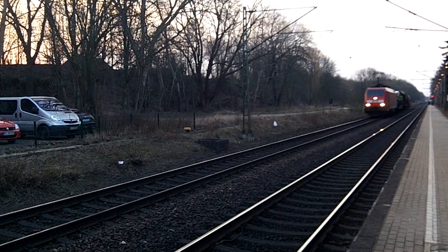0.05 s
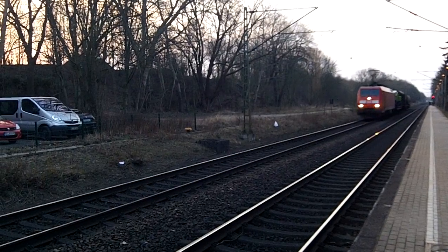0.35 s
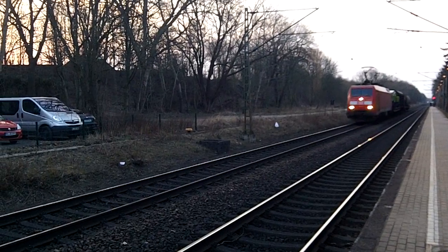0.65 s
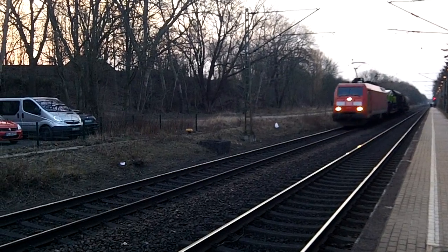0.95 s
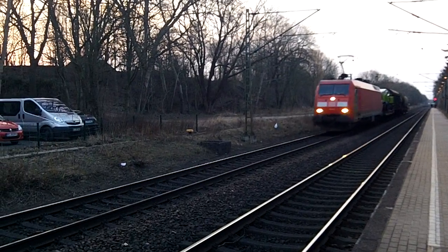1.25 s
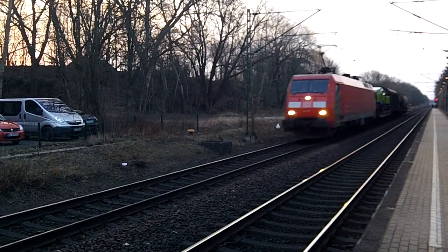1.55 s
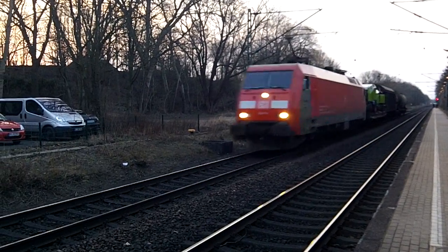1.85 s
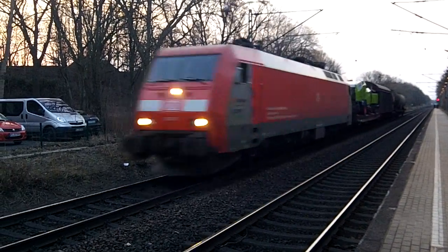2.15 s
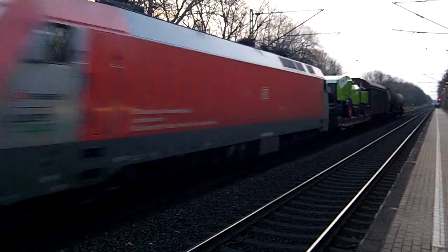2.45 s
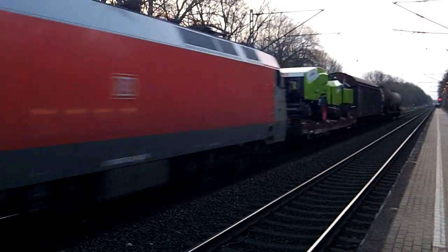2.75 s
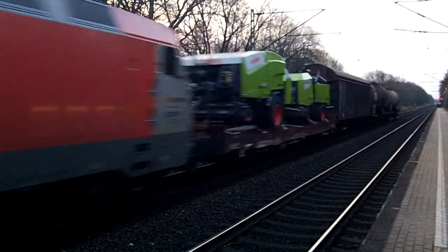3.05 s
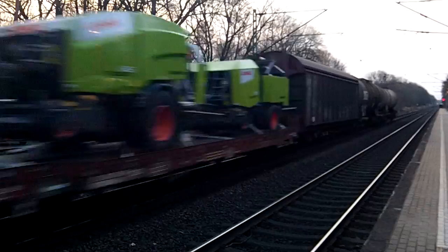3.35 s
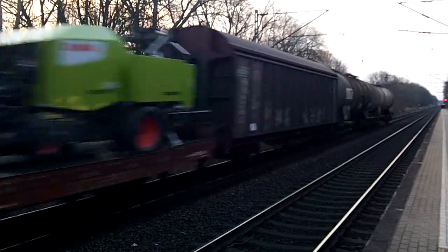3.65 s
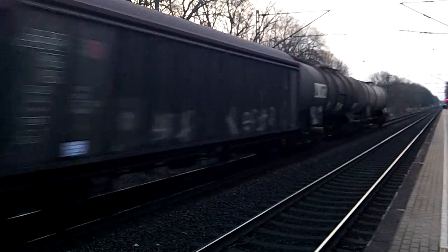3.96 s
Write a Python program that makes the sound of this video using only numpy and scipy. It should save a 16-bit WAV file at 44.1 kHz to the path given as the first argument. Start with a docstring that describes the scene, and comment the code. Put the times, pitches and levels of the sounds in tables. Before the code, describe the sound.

A freight train approaches and rushes past with a growing roar and thudding wheels.

```python
"""Rails roar and sing over a ground rumble, and a small bird chirps faintly: an electric freight train
runs up to a station platform and rushes past on the far track. The locomotive's axles thud over a
rail joint, the wheels hiss as they draw level, and the hollow roar of the wagons takes over, with
short wheel notes and the clank of loose gear. Roar, hiss and rumble are shaped noise, ringing steel
is noise-driven resonances, and the track's modes, the wheel notes and the bird are sines."""
import sys
import numpy as np
from scipy import signal
from scipy.fft import rfft, irfft
from scipy.io import wavfile
from scipy.ndimage import uniform_filter1d

SR = 44100
rng = np.random.default_rng(int(sys.argv[2]) if len(sys.argv) > 2 else 0)


def master_out(mix):
    """Clip the mix to full scale and print it as 16-bit PCM to the path in sys.argv[1]."""
    frames = np.transpose(np.atleast_2d(mix))
    ceiling = np.clip(frames, -1, 1)
    pcm = np.round(ceiling * 32767).astype(np.int16)
    wavfile.write(sys.argv[1], SR, pcm)


N = 176400

# Fader rides of the noise beds: t/s, level/dB
RAIL_FADER = [(0, -34), (.55, -31), (1.2, -29), (1.65, -26), (2.2, -25), (2.65, -28), (3.0, -28.5),
              (3.45, -28), (3.53, -29.5), (3.72, -27), (4, -27)]
WAGON_FADER = [(0, -44), (1.4, -33), (1.55, -28.5), (1.85, -36), (2.1, -31), (2.8, -29.5), (3.2, -27.5),
               (3.45, -24), (3.57, -25), (3.7, -26), (3.79, -27), (4, -24.5)]
HISS_FADER = [(0, -55), (.9, -49.5), (1.5, -43.5), (2.2, -35), (2.52, -36.5), (2.64, -33), (2.8, -33.5),
              (3.15, -34), (3.47, -37), (3.51, -46.5), (3.74, -38), (3.87, -42), (4, -35)]
GROUND_FADER = [(0, -44.5), (.3, -40.5), (.6, -43), (1.2, -41.5), (1.55, -36.5), (1.7, -31), (1.98, -33.5),
                (2.12, -34.5), (2.4, -32.5), (2.6, -33), (2.9, -30.5), (3.1, -30), (3.3, -29.5), (3.5, -36),
                (3.8, -36), (4, -38.5)]
BOGIE_FADER = [(0, -50), (.42, -49), (.55, -44.5), (1.55, -39), (1.7, -35), (1.95, -36.5), (2.4, -32.5),
               (2.65, -32.5), (3.08, -31), (3.3, -36.5), (3.6, -38), (4, -40.5)]
BACKGROUND_FADER = [(0, -65.5), (1.2, -65.5), (2.2, -63), (2.75, -64.5), (3.2, -67.5), (3.6, -70), (4, -70)]
# EQ curves of the noise layers: f/Hz, relative level/dB
RAIL_EQ = [(200, -30), (350, -11.5), (480, -2), (600, -1), (800, -2), (1030, -1), (1500, -3), (1900, -1.5),
           (2300, -5), (2750, -9.5), (3400, -11), (4000, -17), (5000, -21), (6000, -31), (7000, -32),
           (8500, -56)]
WAGON_EQ = [(150, -13), (300, -15), (430, -6.5), (560, -2), (690, -1.5), (870, -4), (1100, -7),
            (1400, -8.5), (2000, -30), (3500, -24.5), (7000, -101)]
HISS_EQ = [(1000, -31), (1800, -1), (2500, 3.5), (3200, 3), (4000, -2.5), (5000, -5), (6200, -10),
           (6900, -17.5), (8000, -40)]
SIZZLE_EQ = [(4000, -8), (5500, 5), (6300, 12), (7000, -9), (9000, -33)]
GROUND_EQ = [(12, 6), (24, 2), (32, -3), (41, 7), (50, 2.5), (80, 2.5), (105, -10.5), (140, -8), (250, -42)]
BOGIE_EQ = [(60, -20), (100, -5.5), (120, -7), (152, -5.5), (185, 1.5), (245, -3), (295, -7), (400, -10.5),
            (800, -42)]
BACKGROUND_EARLY_EQ = [(6000, -6), (8000, -12), (10000, 7.5), (11500, 1.5), (13000, 2.5)]
BACKGROUND_LATE_EQ = [(6000, -4.5), (8000, -3.5), (10000, 6), (11200, -4), (12500, -20)]
BALLAST_EQ = [(25, -7.5), (60, -7), (95, -10), (130, 3), (175, -15), (225, 1), (260, -22), (300, -15),
              (600, -35), (2000, -48)]
# A small bird's calls: t/s, level/dB, length/s
BIRD_CALLS = [(.04, -54, .085), (.37, -51, .11), (.575, -52.5, .075)]
# Bogie, rail and wheel resonances: peak t/s, half length/s, f/Hz, width/Hz, drift/(Hz/s), level/dB
STEEL_RINGS = [(.2, 0.085, 3770, 80, -200, -57), (.25, 0.02, 6740, 94, -800, -57),
               (.5, 0.51, 1077, 490, -3, -36.5), (.685, 0.011, 6530, 400, -2000, -55),
               (1.2, 0.59, 67.4, 24, 0, -39.5), (1.63, 0.42, 1886, 118.8, -1.5, -39.5),
               (2.4, 0.5, 1971, 200, 0, -38), (1.555, 0.0073, 867, 356.4, -6, -21.5),
               (2.11, 0.055, 56.3, 8.1, 0, -28.5), (2.15, 0.14, 602, 160, -0.5, -40),
               (2.58, 0.057, 81.5, 19, -3.5, -28), (2.62, 0.35, 698.2, 63, 0, -30),
               (2.63, 0.063, 2600, 2000, -1.5, -31), (2.44, 0.028, 2002, 2400, 0, -28),
               (2.87, 0.12, 80.8, 41, -4, -31.5), (2.9, 0.21, 196, 26, -1, -36),
               (3.05, .3, 3350, 416.7, -300, -39), (3.17, 0.018, 91.6, 32, -5.5, -29.5),
               (3.3, 0.54, 107.5, 22, -1.5, -38.5), (3.47, 0.04, 735, 150, -300, -23),
               (3.67, 0.058, 600, 150, -1, -33.5), (3.88, 0.047, 690, 130, -3.5, -28)]
# Axles hitting the rail joint: t/s, thud level/dB, clink level/dB
AXLE_HITS = [(1.603, -28.5, -37), (1.701, -30.5, -50), (1.8, -31.5, -58), (2.04, -32, -47),
             (2.15, -33, -38), (2.229, -32.5, -39)]
# Modes of the struck track: f/Hz, t60/s, relative level/dB
THUD_MODES = [(62, 0.19, -3), (130, 0.24, -4), (177, 0.13, 5.5), (221, 0.22, 4.5), (245.5, 0.2, -2)]
# Notes of the wagon wheels: peak t/s, half length/s, f/Hz, glide/(Hz/s), level/dB
WHEEL_NOTES = [(3.34, .03, 640, 600, -31), (3.68, .028, 462, 1300, -29), (3.755, .032, 1040, 100, -28.5),
               (3.86, .035, 850, -500, -30.5)]
# Knocks of loose wagon gear: t/s, level/dB
GEAR_HITS = [(3.612, -23), (3.695, -28), (3.728, -28)]
# Modes of that gear: f/Hz, width/Hz, relative level/dB
GEAR_MODES = [(1135, 160, -4), (1390, 140, -2), (1680, 330, -3.5), (2900, 830, -13)]


def undb(db):
    """Decibels to gain."""
    return 10 ** (np.asarray(db) / 20)


def clock():
    """Time of every sample in seconds."""
    return np.arange(N) / SR


def fader(rows):
    """Gain along a table of t/s, level/dB."""
    return undb(np.interp(clock(), *np.array(rows).T))


def swell(at, half_s):
    """A bell-shaped fade in and out, about 4 dB down half_s either side of its peak."""
    return np.exp(-.5 * ((clock() - at) / half_s) ** 2)


def wobble(rate_hz):
    """Smooth random modulation: held steps, slewed twice, with a spread near 1."""
    hold = max(int(SR / rate_hz), 1)
    steps = rng.standard_normal(N)[np.arange(N) // hold]
    return 1.3 * uniform_filter1d(uniform_filter1d(steps, hold), hold)


def noise(eq):
    """Noise of rms 1 through an EQ curve, rolled off beyond both ends."""
    hz, db = np.array(eq).T
    f = np.maximum(np.fft.rfftfreq(N, 1 / SR), 1)
    gain = undb(np.interp(np.log(f), np.log(hz), db))
    rolloff = np.minimum(f / hz[0], 1) * np.minimum(hz[-1] / f, 1) ** 2
    x = irfft(rfft(rng.standard_normal(N)) * gain * rolloff, N)
    return x / x.std()


def flicker(x, rate_hz, depth_db):
    """Let each half-octave band waver in level by itself."""
    f = np.maximum(np.fft.rfftfreq(N, 1 / SR), 1)
    half_octave = np.clip(2 * np.log2(f), 16, 26)  # band centres from 256 to 8192 Hz
    spectrum = rfft(x)
    bands = (irfft(spectrum * np.maximum(1 - abs(half_octave - k), 0), N) for k in range(16, 27))
    return sum(band * undb(depth_db * wobble(rate_hz)) for band in bands)


def resonance(hz, width_hz):
    """A noise-driven ring of rms 1, width_hz wide at -6 dB; its centre may move."""
    f = np.fft.fftfreq(N, 1 / SR)
    drive = rng.standard_normal(N) + 1j * rng.standard_normal(N)
    sway = np.fft.ifft(np.fft.fft(drive) / (1 + (2 * f / width_hz) ** 2))
    x = np.real(sway * np.exp(2j * np.pi * np.cumsum(hz + np.zeros(N)) / SR))
    return x / x.std()


def rolling():
    """Rough steel on steel: rails roar, wagon bodies boom in time with the wheels, near wheels hiss."""
    turn_hz = 14 * (1 + .062 * wobble(5.1))
    turns = np.cumsum(turn_hz) / SR
    wheel_beat = undb(-2.16 * np.sin(2 * np.pi * turns))  # out-of-round wagon wheels
    rails = flicker(noise(RAIL_EQ), rate_hz=30, depth_db=.86) * fader(RAIL_FADER)
    wagons = flicker(noise(WAGON_EQ), rate_hz=37, depth_db=1) * fader(WAGON_FADER) * wheel_beat
    hiss = flicker(noise(HISS_EQ), rate_hz=36, depth_db=.7) * fader(HISS_FADER)
    sizzle = noise(SIZZLE_EQ) * undb(-47) * swell(at=3.01, half_s=.34)  # locomotive alongside
    judder = undb(.82 * wobble(70.15))  # the running gear shakes all four together
    return (rails + wagons + hiss + sizzle) * judder


def rumble():
    """The low end: the track bed shakes under the load and the bogies drone above it."""
    return noise(GROUND_EQ) * fader(GROUND_FADER) + noise(BOGIE_EQ) * fader(BOGIE_FADER)


def background_hiss():
    """A faint, high background hiss that swells slightly, then grows duller and quieter."""
    dull = np.interp(clock(), (.73, 3.1), (0, 1))
    blend = np.sqrt(1 - dull) * noise(BACKGROUND_EARLY_EQ) + np.sqrt(dull) * noise(BACKGROUND_LATE_EQ)
    return blend * fader(BACKGROUND_FADER)


def bird(start_hz=5330, end_hz=4700, fall_s=.041):
    """Thin whistles that slide down and level off."""
    out = 0
    for at, db, length in BIRD_CALLS:
        age = np.clip(clock() - at, 0, length)
        pitch = end_hz + (start_hz - end_hz) * np.exp(-age / fall_s)
        envelope = undb(db + 1.27 * wobble(61)) * np.sqrt(np.abs(np.sin(np.pi * age / length)))
        out += envelope * np.sin(2 * np.pi * np.cumsum(pitch) / SR)
    return out


def steel_rings():
    """Resonances of bogies, rails and wheels, narrow or broad, swell, drift in pitch and fade."""
    out = 0
    for at, half_s, hz, width_hz, drift, db in STEEL_RINGS:
        centre = hz + drift * np.clip(clock() - at, -2 * half_s, 2 * half_s)
        out += resonance(centre, width_hz) * undb(db) * swell(at, half_s)
    return out


def rail_song(at=.94, hz=3340, sway_hz=45, throb_hz=11, throb_db=5.5):
    """A thin ring runs ahead in the rails, rising in level and dipping in pitch with each wheel turn."""
    throb = np.cos(2 * np.pi * throb_hz * (clock() - at))
    envelope = undb(-48.5 + throb_db * throb) * swell(at, half_s=.33)
    return resonance(hz - sway_hz * throb, width_hz=70) * envelope


def axle_thuds(attack_s=.008, hold_s=.04, thud_decay_s=.02, clink_decay_s=.018, ring_db=1):
    """Each axle drops into the joint with a short clink; the track rings low and the ballast thuds."""
    ballast = noise(BALLAST_EQ)
    steel = resonance(3810, width_hz=1140)
    mode_phases = np.pi * rng.uniform(-1.16, 1, (len(AXLE_HITS), len(THUD_MODES)))
    out = 0
    for (at, thud_db, clink_db), phases in zip(AXLE_HITS, mode_phases):
        age = np.maximum(clock() - at, 0)
        attack = np.minimum(age / attack_s, 1)
        ring = sum(undb(db - 60 * age / t60) * np.sin(2 * np.pi * hz * age + phase)
                   for (hz, t60, db), phase in zip(THUD_MODES, phases))
        thud = ballast * np.exp(-np.maximum(age - hold_s, 0) / thud_decay_s)
        clink = steel * np.exp(-np.maximum(age - attack_s, 0) / clink_decay_s)
        out += attack * (undb(thud_db) * (thud + undb(ring_db) * ring) + undb(clink_db) * clink)
    return out


def wheel_notes(pitch_waver=.0087, flutter_db=1.8):
    """Wagon wheels ring as they run by: short, rough notes that bend in pitch."""
    out = 0
    for at, half_s, hz, glide, db in WHEEL_NOTES:
        bend = glide * np.clip(clock() - at, -2 * half_s, 2 * half_s)
        pitch = (hz + bend) * (1 + pitch_waver * wobble(90))
        envelope = undb(db + flutter_db * wobble(80)) * swell(at, half_s)
        out += envelope * np.sqrt(2) * np.sin(2 * np.pi * np.cumsum(pitch) / SR)
    return out


def gear_clanks(attack_s=.005, decay_s=.02):
    """Loose steel on the wagons knocks and rings briefly."""
    steel = sum(resonance(hz, width_hz) * undb(db) for hz, width_hz, db in GEAR_MODES)
    envelope = 0
    for at, db in GEAR_HITS:
        age = np.maximum(clock() - at, 0)
        attack = np.minimum(age / attack_s, 1)
        envelope += undb(db) * attack * np.exp(-np.maximum(age - attack_s, 0) / decay_s)
    return steel * envelope


def scene():
    """The mono mix: train and bird as heard from the platform."""
    train = rolling() + rumble() + rail_song() + steel_rings()
    train += wheel_notes() + axle_thuds() + gear_clanks()
    return (train + bird())[None]


def record(dry, mic_edge_hz=7220, top_hz=13500):
    """A small microphone cuts the highs steeply; only a faint background hiss sits above its edge."""
    mic_cut = signal.ellip(10, .2, 70, mic_edge_hz, fs=SR, output="sos")
    top_cut = signal.ellip(8, .2, 70, top_hz, fs=SR, output="sos")
    return signal.sosfilt(top_cut, signal.sosfilt(mic_cut, dry) + background_hiss())


dry = scene()
out = record(dry)
master_out(out)
```